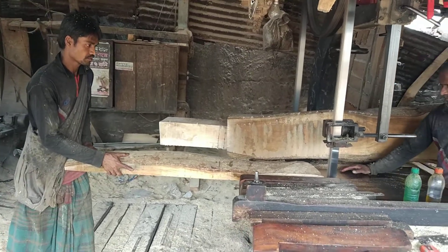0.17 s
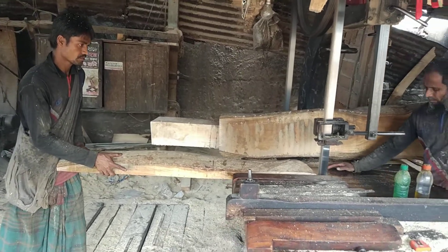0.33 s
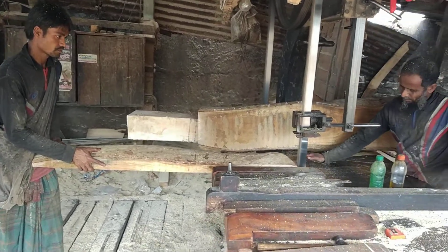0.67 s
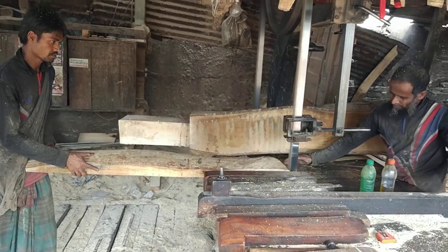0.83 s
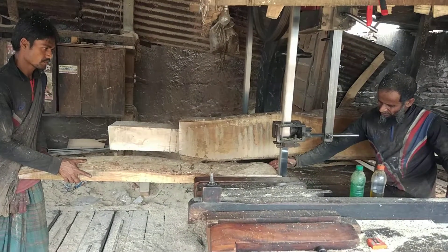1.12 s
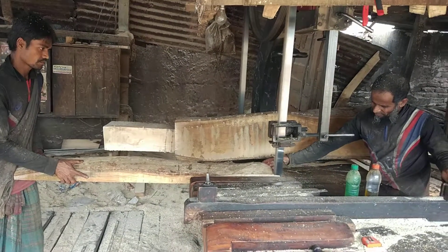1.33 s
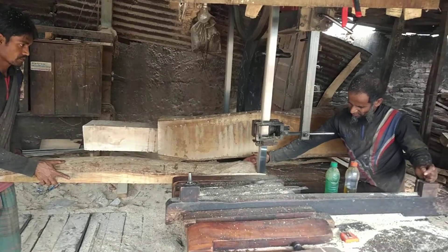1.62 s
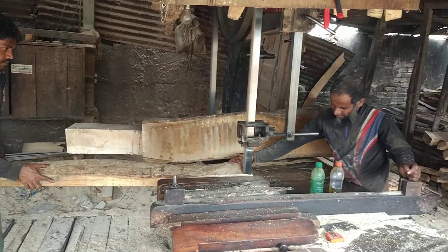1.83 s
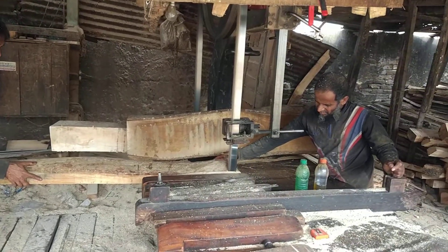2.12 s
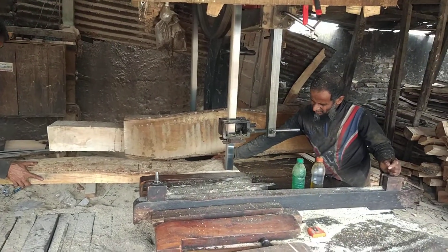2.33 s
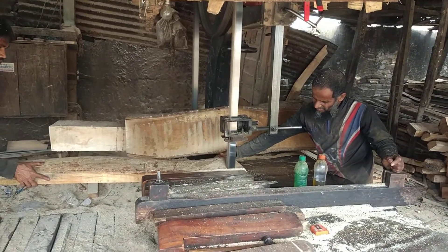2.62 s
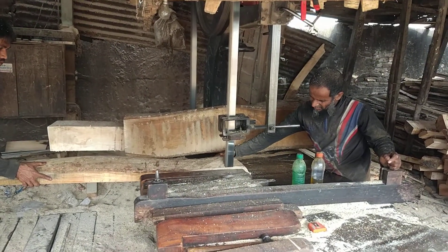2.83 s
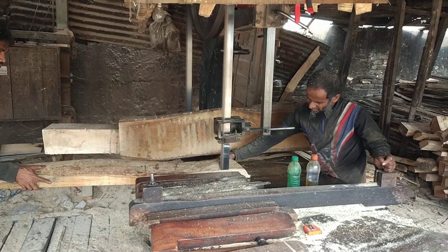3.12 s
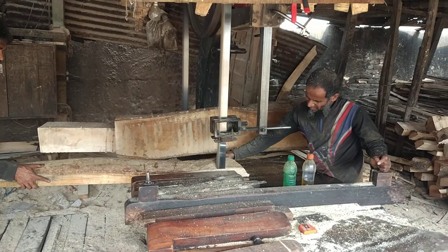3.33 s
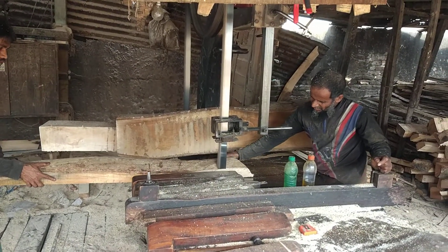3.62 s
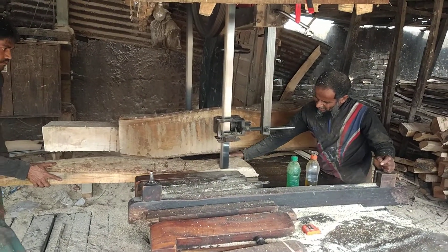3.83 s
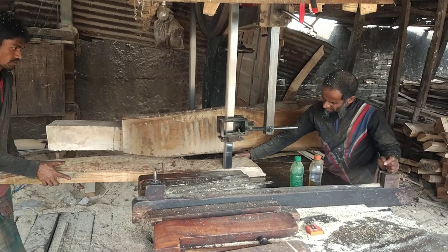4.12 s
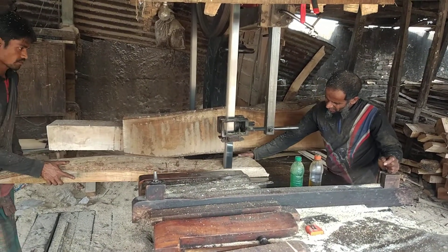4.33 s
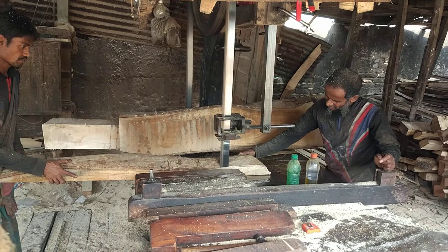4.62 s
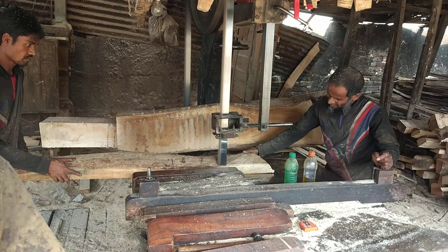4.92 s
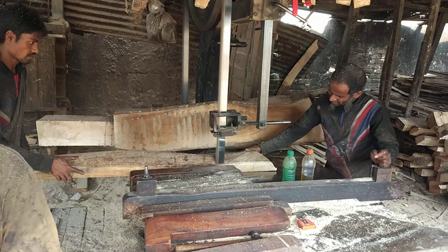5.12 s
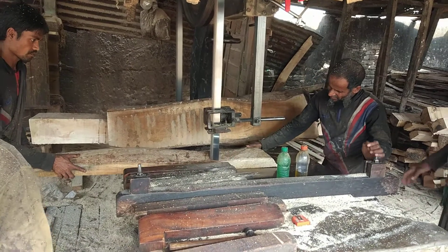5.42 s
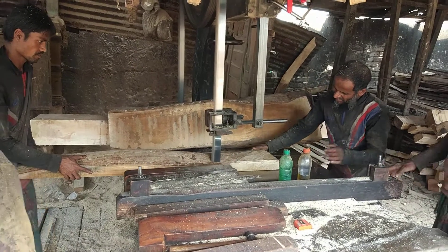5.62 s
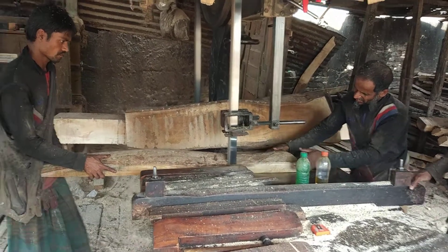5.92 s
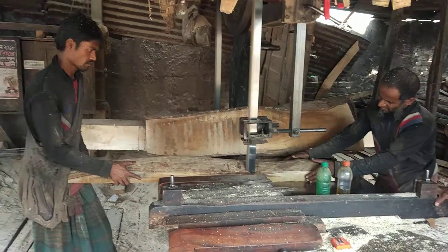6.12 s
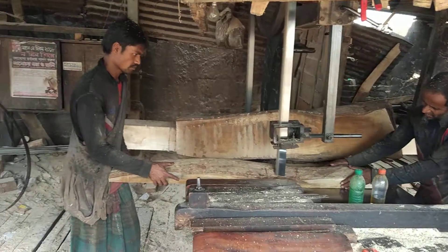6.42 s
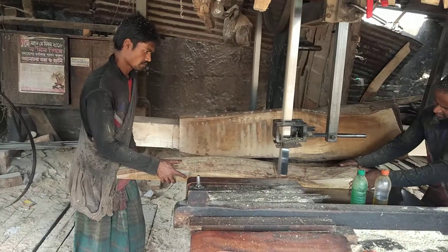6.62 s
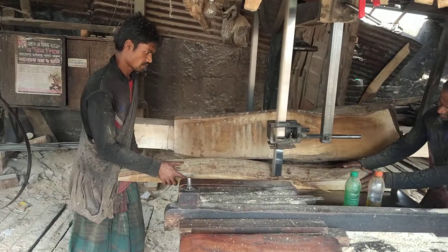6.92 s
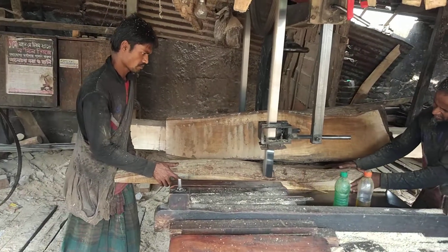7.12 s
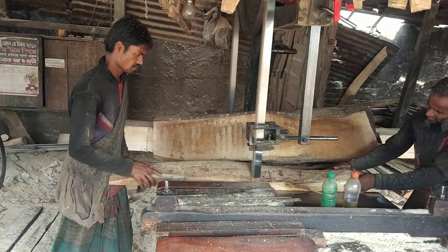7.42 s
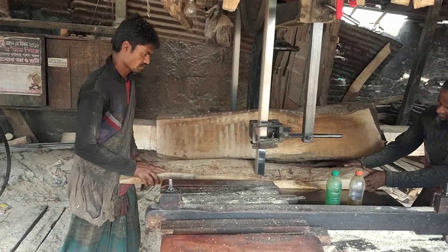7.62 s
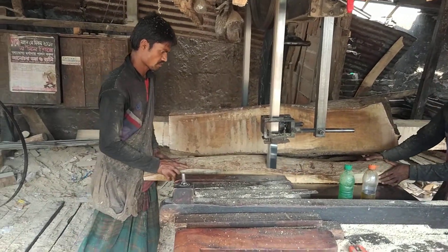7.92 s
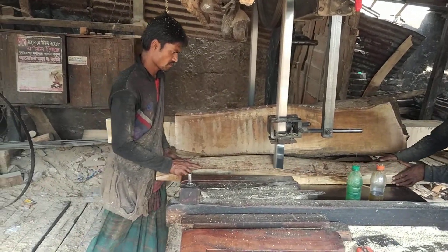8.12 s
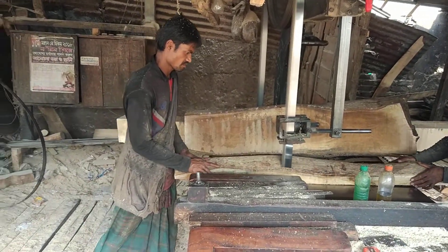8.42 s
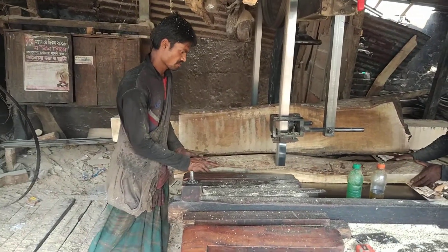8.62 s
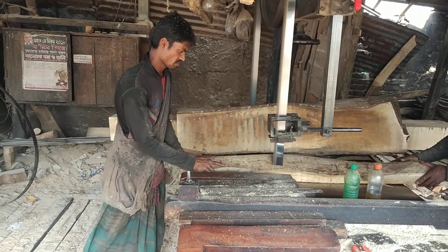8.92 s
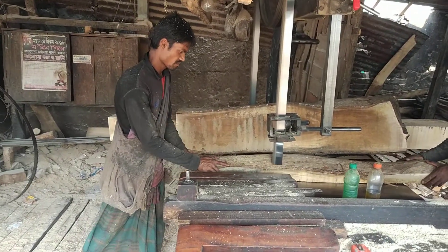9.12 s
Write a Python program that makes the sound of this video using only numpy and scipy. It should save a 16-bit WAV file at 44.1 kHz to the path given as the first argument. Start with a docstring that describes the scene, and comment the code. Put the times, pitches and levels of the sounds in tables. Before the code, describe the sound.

Loud continuous sawmill cutting: a bright steel whine around a harsh spray of hiss, with thin guide squeals and low machine hum beneath.

```python
"""A loud, fluttering hiss of sawdust and a steely whine: a big band saw rips steadily through a timber slab.
It stands in a tin-roofed shed, a couple of metres from a hand-held phone. Irregular tooth bites are random
clicks that ring the steel band (the whine) and the slab (a hollow drone); filtered clicks make the spray,
swinging with the band wheels. The guides sing thinly, and the drive hums and rumbles through the frame."""
import sys
import numpy as np
from scipy import signal
from scipy.fft import rfft, irfft, next_fast_len
from scipy.io import wavfile
from scipy.ndimage import uniform_filter1d, map_coordinates

SR = 44100
rng = np.random.default_rng(int(sys.argv[2]) if len(sys.argv) > 2 else 0)


def int16_out(signal):
    """Quantize to a 16-bit WAV file."""
    q = np.round(np.clip(np.atleast_2d(signal).T, -1, 1) * 32767)
    wavfile.write(sys.argv[1], SR, q.astype(np.int16))


N = 408366
TIME = np.arange(N) / SR  # s
SIZE = next_fast_len(N, True)
FREQ = np.maximum(np.arange(SIZE // 2 + 1) * SR / SIZE, 1)  # Hz
BELT_HZ = 7.1  # rounds of the drive belt a second


def undb(db):
    """Decibels to gain."""
    return 10 ** (np.asarray(db) / 20)


def unit(x):
    """Scale to rms 1."""
    return x / np.sqrt(np.mean(x ** 2))


def curve(table):
    """Join (time, value) points with straight lines, sample by sample."""
    s, value = np.transpose(table)
    return np.interp(TIME, s, value)


def outline(points):
    """Join (frequency, value) points on a log-frequency axis."""
    hz, value = np.transpose(points)
    return np.interp(np.log(FREQ), np.log(hz), value)


def fed(start, per_s):
    """A level or pitch that drifts evenly as the slab is fed through."""
    return start + per_s * TIME


def bumps(table):
    """A smooth rise and fall in dB for each row, summed."""
    return sum(db * np.exp(-(2 * (TIME - s) / length) ** 2) for s, length, db in table)


def walk(rate):
    """Slow chance: random levels, `rate` a second, joined smoothly and scaled to rms 1."""
    points = rng.standard_normal(size=1024)
    joined = np.interp(TIME * rate, np.arange(len(points)), points)
    return unit(uniform_filter1d(joined, int(SR / rate / 2)))


def filtered(x, gain):
    """Filter by a gain for each frequency."""
    return irfft(rfft(x, SIZE) * gain, SIZE)[..., :N]


def shape(x, gain):
    """Filter, then scale to rms 1."""
    return unit(filtered(x, gain))


def above(hz, order):
    """Gain of a high-pass."""
    return 1 / (1 + (hz / FREQ) ** order)


def resonances(modes):
    """Gain of steep-sided modes whose powers add; each is halved one width away from its centre."""
    power = 0
    for hz, width, db in modes:
        away = (FREQ - hz * hz / FREQ) / (2 * width)
        power = power + undb(2 * db) / (1 + away ** 2) ** 2
    return np.sqrt(power)


def bend(paths, pitch):
    """Move the pitch by a ratio that changes over time."""
    place = [N - 1 - np.cumsum(pitch[::-1])[::-1]]
    return np.array([map_coordinates(path, place, order=1, mode="mirror") for path in paths])


# thick churn of belts and wheels: (frequency [Hz], relative level per Hz [dB])
CHURN_SPECTRUM = [(25, -57), (50, -44), (75, -25), (100, -29), (150, -8), (220, 5), (400, -4), (465, -11),
                  (600, 3), (1000, 8.5), (1120, 1.5), (1300, 0), (2000, 2), (3500, -19)]
# frame resonances: (frequency [Hz], half width [Hz], relative level [dB])
FRAME_MODES = [(171, 23, -11), (208, 24, -4), (243, 22, 0), (291, 40, -4), (383, 40, -1)]
# fader of the drive's rumble: (time [s], level [dB])
RUMBLE_LEVEL = [(0, -35), (2.55, -37.5), (2.68, -41.5), (3.4, -39), (4.9, -40.5), (5.6, -36.5),
                (7.4, -39.5), (8.5, -39), (9.0, -36)]
# hum lines, whole belt rates apart: (frequency [Hz], relative level [dB])
HUM_TONES = [(237.7, -4), (244.8, 0), (259.0, -12)]
# fader of the hum, which builds up, drops away and comes back: (time [s], level [dB])
HUM_LEVEL = [(0, -42), (1.0, -46), (1.9, -38.5), (2.55, -33.5), (2.66, -61), (3.15, -45), (3.6, -39),
             (5.15, -40.5), (5.4, -56), (5.75, -40), (6.2, -42.5), (8.4, -38.5), (8.6, -36), (9.26, -43)]


def drive():
    """Wheels and belts shake the frame: beating sines, resonant noise and a broad churning."""
    clock = TIME - 0.083  # the belt first shakes the frame here, s
    drift = 0.6 * walk(4)
    lines = 0
    # the lines drift together and beat once for each round of the belt
    for hz, db in HUM_TONES:
        phase = 2 * np.pi * hz * clock + drift + 0.45 * walk(5)
        lines = lines + undb(db) * np.sin(phase)
    direct_only = np.array([[1], [0], [0]])
    hum = unit(lines) * undb(curve(HUM_LEVEL) + walk(6.6)) * direct_only

    belt = np.cos(2 * np.pi * BELT_HZ * clock)
    shaking = rng.standard_normal((3, N))
    # the same noise backwards keeps rumble and churn from moving as one
    rumble = shape(shaking[:, ::-1], resonances(FRAME_MODES))
    rumble = rumble * undb(curve(RUMBLE_LEVEL) + 0.37 * belt)
    churn = shape(shaking, undb(outline(CHURN_SPECTRUM))) * undb(-32.5)
    return hum + rumble + churn


# thin tones of the band rubbing in its guides, ahead of the left and right trim:
# (start [s], end [s], frequency [Hz], level [dB])
GUIDE_TONES = [(0, 1.0, 2155, -38), (0, 5.5, 1845, -45), (3.2, 5.6, 1630, -44), (4.6, 9.6, 2136, -37),
               (5.9, 7.3, 1380, -41), (7.0, 8.2, 1605, -44)]


def guides():
    """The band brushes its guides and sings in thin, unsteady tones: narrow slices of noise."""
    out, rubbing = 0, rfft(rng.standard_normal((2, SIZE)))
    for start, end, hz, db in GUIDE_TONES:
        swell = np.clip(np.minimum(TIME - start, end - TIME) / 0.13, 0, 1)
        tone = unit(irfft(rubbing * resonances([(hz, 9, 0)]), SIZE)[:, :N])
        out = out + swell * undb(db) * tone
    left_right_db = np.array([[-1.5], [1.2]])
    return out * undb(left_right_db)


def bites(per_second):
    """Fibres snapping under the teeth: dense clicks of uneven size, along one direct and two scattered paths."""
    struck = rng.random((3, N)) < per_second / SR
    return struck * rng.standard_normal((3, N))


# slab and saw table resonances, which shift their weight along the cut:
# (frequency [Hz], half width [Hz], relative level at the start [dB], relative level at the end [dB])
SLAB_MODES = [(510, 20, -7.5, -3.5), (537, 12, -3.5, -1), (670, 24, -6.5, -1.5), (730, 22, -15, -6),
              (768, 8, -6, -4), (795, 6, 3.5, -3), (815, 14, -10, -5), (868, 24, -5, -3.5), (925, 8, -6, 4),
              (972, 9, 2.5, 0.5), (999, 8, 2.5, 2), (1030, 30, -7, -5), (1050, 5, -10, 2.5),
              (1625, 25, -11, -12)]
# fader of the drone, with a brief dip: (time [s], level [dB])
DRONE_LEVEL = [(0, -31.5), (2.5, -31), (2.75, -34.5), (3.5, -32), (5.2, -31.5), (9.26, -31)]
# modes of the slab's loose half, tuned as at the boom's peak: (frequency [Hz], half width [Hz], relative level [dB])
BOOM_MODES = [(768, 8, 6), (802, 13, 5), (745, 40, -4), (670, 16, -1), (860, 45, -6), (1076, 13, -2)]
# fader of the loose half, which booms as the cut lengthens: (time [s], level [dB])
BOOM_LEVEL = [(0, -60), (4.8, -52), (5.5, -40), (5.9, -32), (6.3, -30), (6.7, -33), (7.7, -39), (8.4, -34),
              (9.26, -43)]


def slab():
    """The teeth also knock the timber and the table under it; the loose half booms lower as it lengthens."""
    knocks, along = bites(9000), TIME / TIME[-1]
    early = filtered(knocks, resonances([(hz, width, db) for hz, width, db, _ in SLAB_MODES]))
    late = filtered(knocks, resonances([(hz, width, db) for hz, width, _, db in SLAB_MODES]))
    drone = unit(early * (1 - along) + late * along)
    peak_s, sag_per_s = 6.3, 0.016  # the pitch sinks by this share each second
    boom = bend(shape(knocks, resonances(BOOM_MODES)), 1 - sag_per_s * (TIME - peak_s))
    return drone * undb(curve(DRONE_LEVEL)) + boom * undb(curve(BOOM_LEVEL))


# brief surges of the hiss and the higher rings: (middle [s], length [s], rise [dB])
LOAD_SURGES = [(0.3, 0.45, 0), (1.27, 0.14, 0.8), (2.8, 0.13, 0.6), (4.37, 0.39, 0.6), (4.71, 0.11, 0.8),
               (6.55, 0.15, 0.5), (7.22, 0.13, 0.9)]


def tooth_load(wheel_db, double_db, loop_db, grain_db):
    """Tooth load in dB swings with wheel run-out and with the uneven set along the band, and surges in hard grain."""
    wheel_hz, loop_hz = 12, 3.3  # turns a second of the wheels and of the whole band
    turned = TIME + 0.03 * walk(1.5)
    wheel = 2 * np.pi * wheel_hz * turned
    run_out = wheel_db * np.sin(wheel) + double_db * np.sin(2 * wheel)
    tooth_set = 0
    for k in range(1, 9):
        tooth_set = tooth_set + np.cos(2 * np.pi * (k * loop_hz * turned + rng.random()))
    return run_out + loop_db * unit(tooth_set) + grain_db * walk(9) + bumps(LOAD_SURGES)


# colour of the sawdust spray, ahead of its low cut: (frequency [Hz], relative level per Hz [dB])
SPRAY_SPECTRUM = [(500, -27), (1200, -12), (2050, -4.5), (2900, -0.5), (3380, 1), (3900, 0), (4900, 3),
                  (5900, 1.5), (7600, 3.5), (9300, -3.5), (11000, -5), (12700, -7), (14800, -15),
                  (15700, -13.5)]


def sawdust(load_db):
    """Chips and air shoot from the kerf as filtered clicks; the finest dust fizzes more as the cut goes on."""
    spray = shape(bites(40000), undb(outline(SPRAY_SPECTRUM)) * above(400, order=4))
    finest = filtered(spray, above(11200, order=12))
    fizz_db = fed(start=-0.4, per_s=0.38) + 1.2 * walk(22)
    spray = spray - finest + finest * undb(fizz_db)
    return spray * undb(fed(start=-14.5, per_s=-0.028) + load_db)


# bending across the band's width; lengthwise waves crowd above each cut-on:
# (cut-on [Hz], spread [Hz], level against the whine [dB])
BAND_CLUSTERS = [(2232, 570, 0), (6024, 960, 2), (11580, 780, -10.5)]
# narrow higher rings of the steel: (frequency [Hz], half width [Hz], relative level [dB])
BAND_OVERTONES = [(3270, 70, -6), (3400, 60, -5), (4300, 60, -6.5), (6420, 90, 0), (6950, 70, -4.5),
                  (9120, 120, -12), (13850, 130, -18)]
# the lowest ring flares up: (middle [s], length [s], rise [dB])
RING_FLARES = [(0.75, 0.26, 6), (5.57, 0.42, 4.5)]
# each round of the belt swings the lowest ring's pull, most in mid-cut: (time [s], swing [Hz])
BELT_SWING = [(0, 25), (3, 40), (4.6, 95), (7.3, 90), (9.26, 35)]


def blade(load_db):
    """The steel band rings in clusters that start sharply at each cut-on and thin out above it."""
    slack_hz, ring_half_width_hz, wander_hz = 2274, 30, 55
    belt = np.cos(2 * np.pi * BELT_HZ * (TIME - 0.062))  # first tug at 0.062 s
    flare_db = bumps(RING_FLARES)
    # tension pulls the lowest ring sharp, never below its slack pitch; in a flare it settles towards it
    pull_hz = fed(start=42, per_s=9) + curve(BELT_SWING) * belt + wander_hz * walk(6)
    pitch = 1 + np.maximum(pull_hz, 0) * undb(-2 * flare_db) / slack_hz
    ring = shape(bites(9000), resonances([(slack_hz, ring_half_width_hz, 0)]))
    out = bend(ring, pitch) * undb(fed(start=-26, per_s=-0.36) + flare_db)

    teeth, whine_db = bites(20000), fed(start=-23.5, per_s=-0.21)
    for order, (cut_on, spread, db) in enumerate(BAND_CLUSTERS):
        beyond = FREQ - cut_on
        onset = 1 + np.tanh(beyond / (0.0021 * cut_on))
        power = onset / (1 + (beyond / spread) ** 2) ** 2.76
        if order == 0:  # damped by the kerf, it pulses with the belt
            level_db = whine_db + 0.4 * belt
        else:  # the higher clusters follow the tooth load
            level_db = np.mean(whine_db) + load_db
        out = out + shape(teeth, np.sqrt(power)) * undb(level_db + db)
    overtones = shape(bites(9000), resonances(BAND_OVERTONES))
    return out + overtones * undb(-30.5 + load_db)


# how deeply whine and hiss flicker, ahead of evening out each band: (frequency [Hz], largest swing [dB])
FLICKER_DEPTH = [(2300, 1.5), (2600, 3), (2900, 5), (4200, 5.3), (4800, 3.3), (6400, 2.5), (8000, 3),
                 (9200, 5.5)]
# reflections hollow out (or lift) the sound at pitches that shift as the phone moves;
# one track each, its depth wavering: (time [s], centre [Hz], nominal gain [dB])
HOLLOW_TRACKS = [
    [(0, 3080, -9), (2.3, 3000, -11), (3.6, 3000, -2), (4.8, 2980, -8), (5.7, 3080, -5), (6.4, 2880, -9),
     (9.26, 2880, -2)],
    [(0, 4100, -7), (1.1, 3950, -11), (2.2, 3700, -1), (4.6, 3630, -5), (5.4, 3720, -4), (6.2, 3830, -10),
     (7.3, 4020, -8), (8.5, 4130, -13)],
    [(0, 5700, 5), (5.8, 5760, -3), (6.7, 5680, -2), (8.4, 5560, -7)],
]


def flicker(paths, band_hz, hold_s):
    """Narrow bands swell and fade on their own, and reflections' hollows drift through them."""
    size, hop = 1024, 512
    hz, s, spectra = signal.stft(paths, SR, nperseg=size)
    field = rng.standard_normal(spectra.shape[1:])
    bins, frames = int(band_hz * size / SR), int(hold_s * SR / hop)
    blur = np.outer(np.hanning(2 * bins + 1), np.hanning(2 * frames + 1))
    field = np.tanh(unit(signal.fftconvolve(field, blur, "same")))
    depth_db = np.interp(hz, *np.transpose(FLICKER_DEPTH))[:, None]
    gain = undb(depth_db * field)
    gain = gain / np.sqrt(np.mean(gain ** 2, axis=1, keepdims=True))  # each band keeps its power
    half_width_hz, waver = 95, 0.7  # waver: share by which the depth varies
    for track in HOLLOW_TRACKS:
        when, centre, db = np.transpose(track)
        away = (hz[:, None] - np.interp(s, when, centre)) / half_width_hz
        gain = gain * undb(np.interp(s, when, db) * np.exp(-away ** 2) * (1 - waver * field))
    return signal.istft(spectra * gain)[1][:, :N]


# the phone turns a little: (time [s], lag of the left microphone [samples])
LEFT_LAG = [(0, 0.71), (1, 1.7), (3, 2.8), (5.6, 3.3), (6.5, 1.7), (9.26, 0.45)]
# direct sound, the same at both microphones: (frequency [Hz], share of the power [0-1])
DIRECT_SHARE = [(40, .5), (80, .6), (150, 0.96), (300, 1), (700, 0.93), (1200, 0.57), (1600, 0.71),
                (1900, 0.25), (2280, 0.9), (2480, 0.72), (2700, 0.46), (3000, 0.14), (3400, 0.27),
                (3800, 0.058), (15000, 0.1)]
# stereo balance: (frequency [Hz], left minus right [dB])
STEREO_BALANCE = [(60, 0), (150, -4), (400, -7), (900, -3.5), (1900, -4), (2250, -0.5), (2700, 0),
                  (4000, 0), (5000, 3), (6300, 0), (8500, -1.5), (12000, 1)]


def ports(paths):
    """The direct path reaches both microphones; the shed's scattered sound differs at each and rules the treble."""
    lagged = np.arange(N) - curve(LEFT_LAG)
    left = map_coordinates(paths[0], [lagged], order=3, mode="mirror")
    direct = np.array([left, paths[0]])
    share = np.clip(outline(DIRECT_SHARE), 0, 1)
    balance = undb(outline(STEREO_BALANCE) * np.array([[1], [-1]]) / 2)
    balance = balance / np.sqrt(np.mean(balance ** 2, axis=0))
    scattered = filtered(paths[1:], balance * np.sqrt(1 - share))
    return filtered(direct, balance * np.sqrt(share)) + scattered


def scene():
    """One tooth load drives blade and sawdust together, over slab, drive and guides."""
    load_db = tooth_load(wheel_db=0.24, double_db=0.15, loop_db=0.22, grain_db=0.12)
    saw = flicker(blade(load_db) + sawdust(load_db), band_hz=135, hold_s=0.05)
    return ports(saw + slab() + drive()) + guides()


def record(dry):
    """The phone rounds the rare highest peaks and cuts the top."""
    ceiling, top_hz = 0.82, 15750
    rounded = dry / (1 + (dry / ceiling) ** 22) ** (1 / 22)
    return signal.sosfilt(signal.ellip(12, .1, 80, top_hz, fs=SR, output="sos"), rounded)


dry = scene()
out = record(dry)
int16_out(out)
```